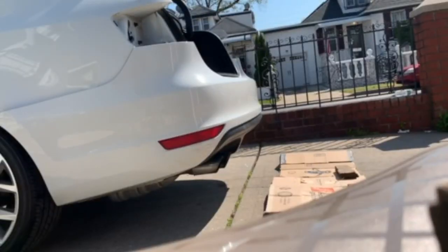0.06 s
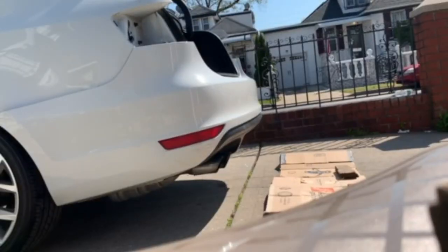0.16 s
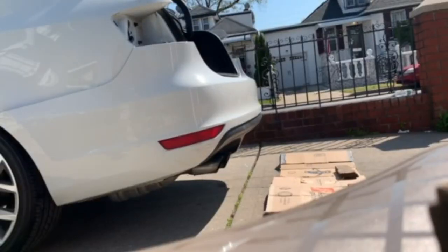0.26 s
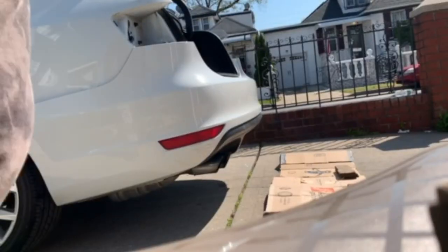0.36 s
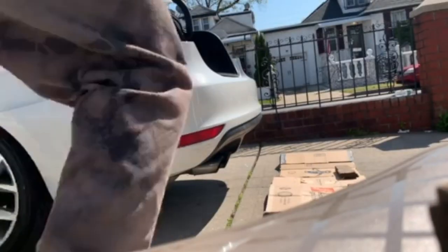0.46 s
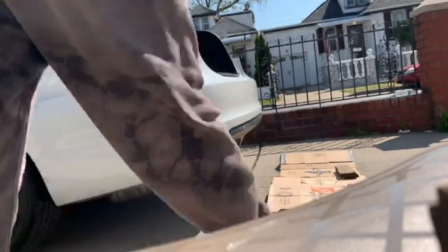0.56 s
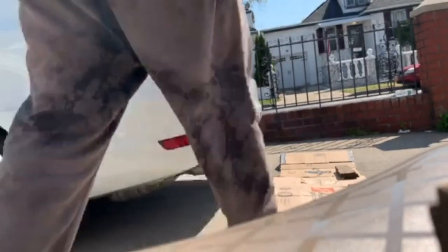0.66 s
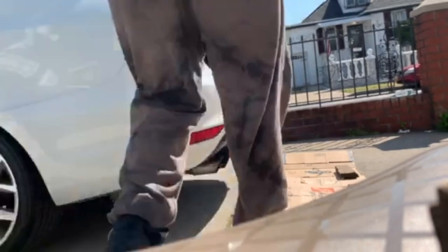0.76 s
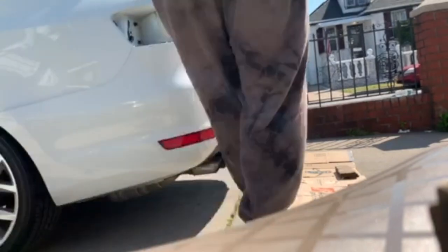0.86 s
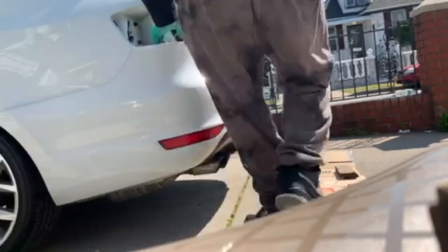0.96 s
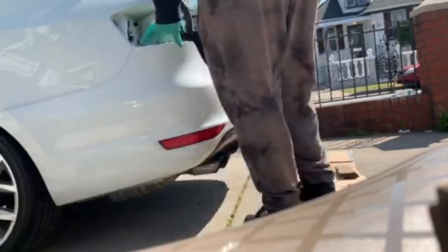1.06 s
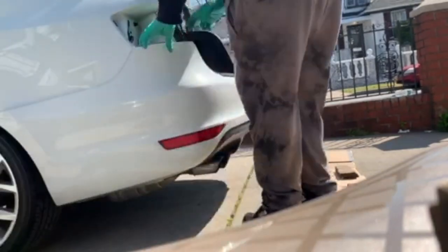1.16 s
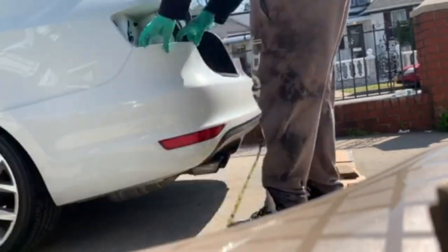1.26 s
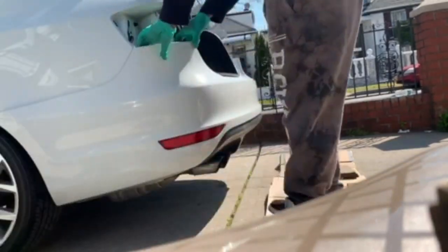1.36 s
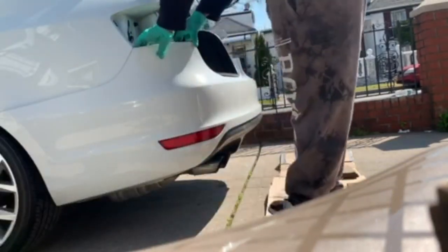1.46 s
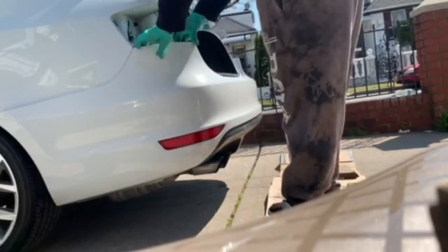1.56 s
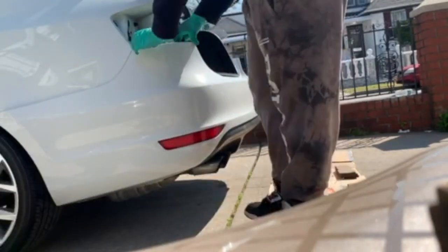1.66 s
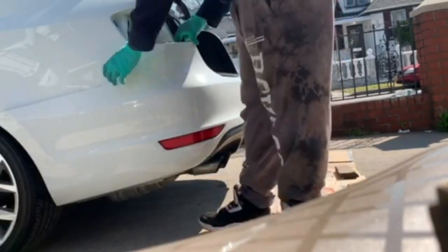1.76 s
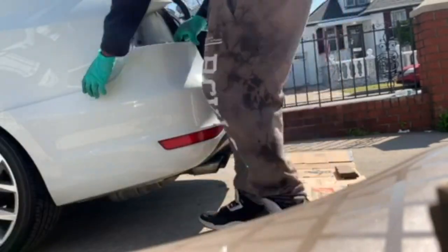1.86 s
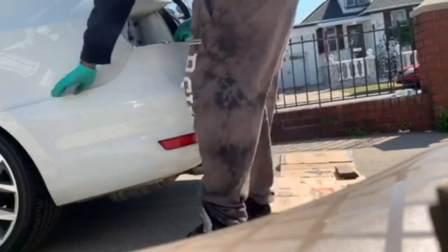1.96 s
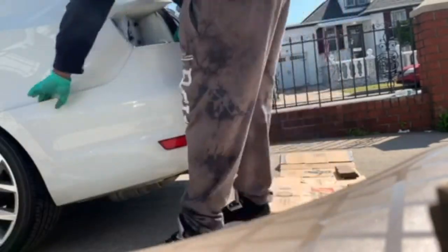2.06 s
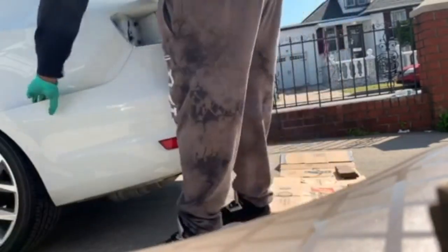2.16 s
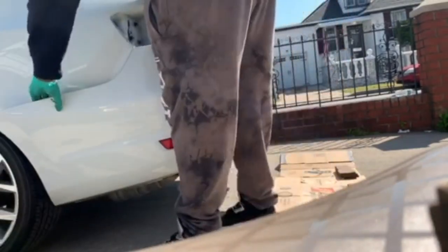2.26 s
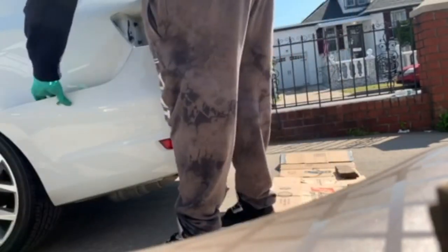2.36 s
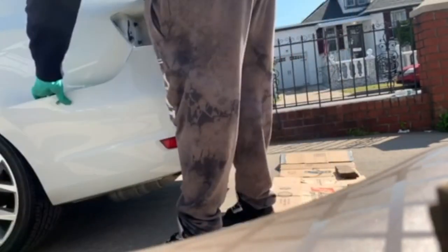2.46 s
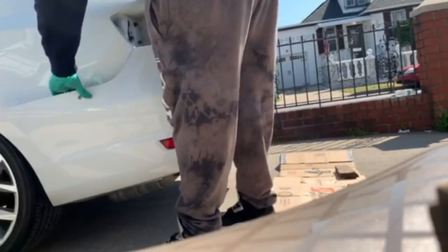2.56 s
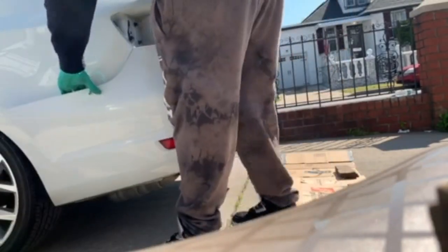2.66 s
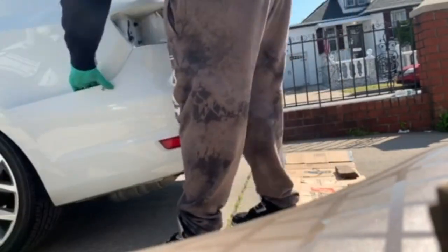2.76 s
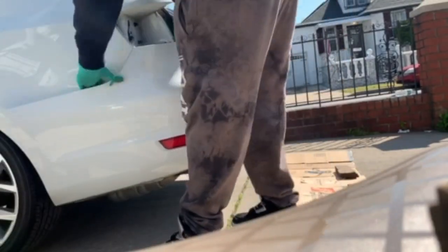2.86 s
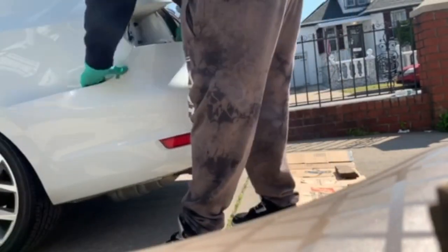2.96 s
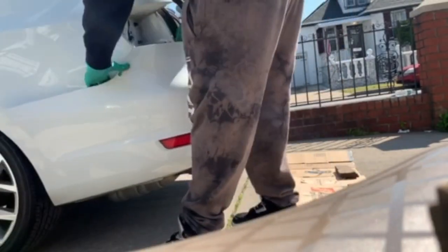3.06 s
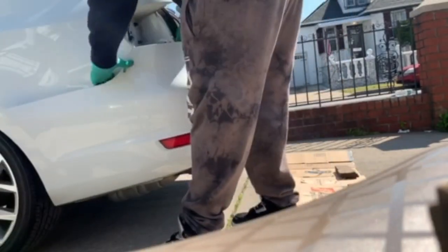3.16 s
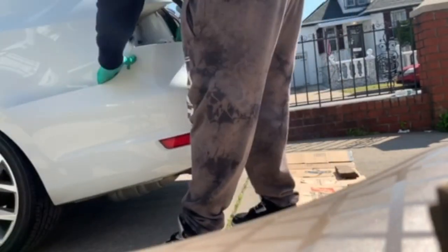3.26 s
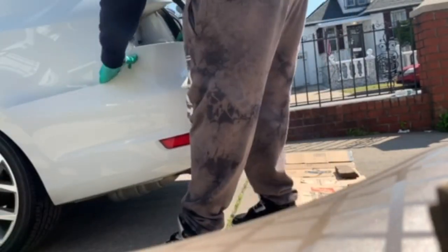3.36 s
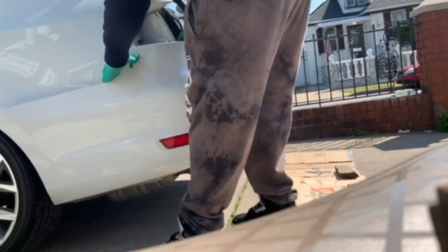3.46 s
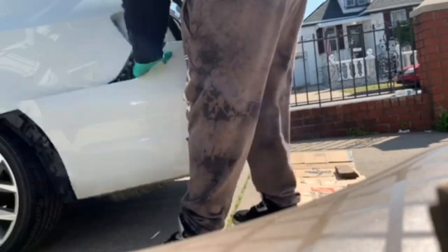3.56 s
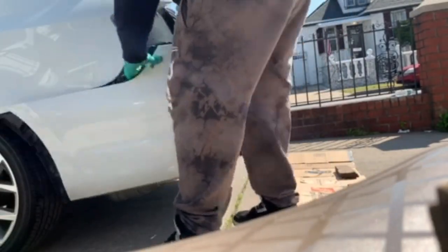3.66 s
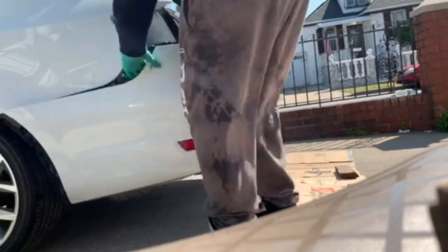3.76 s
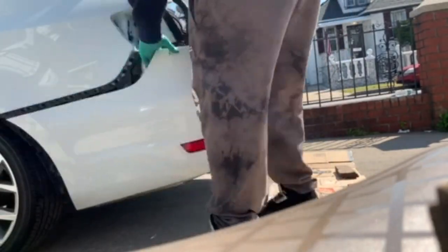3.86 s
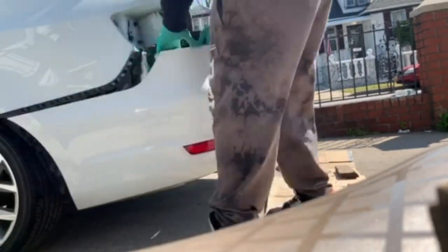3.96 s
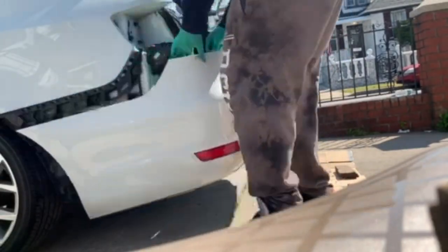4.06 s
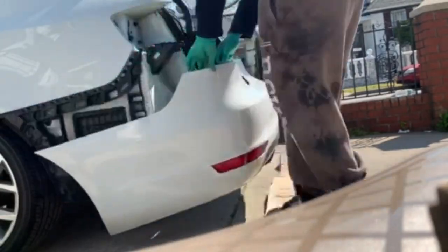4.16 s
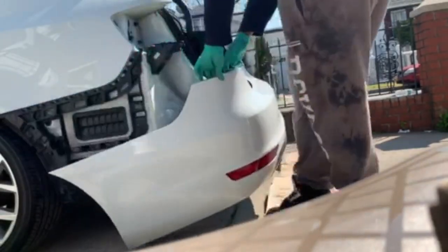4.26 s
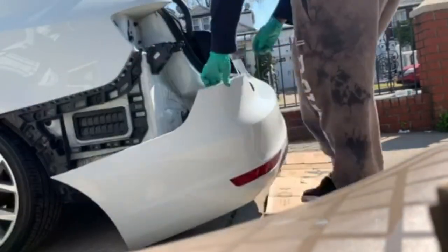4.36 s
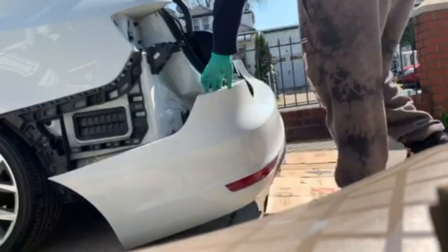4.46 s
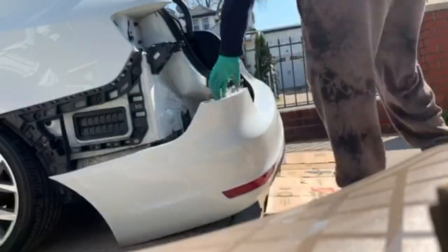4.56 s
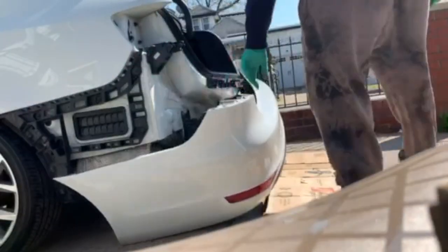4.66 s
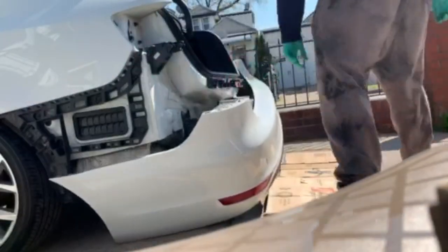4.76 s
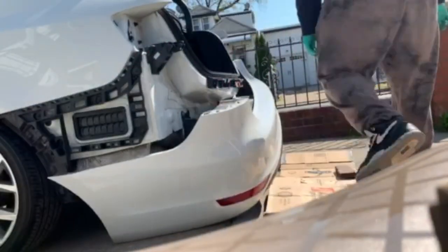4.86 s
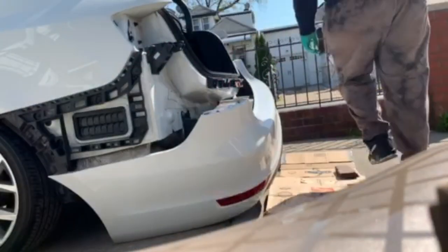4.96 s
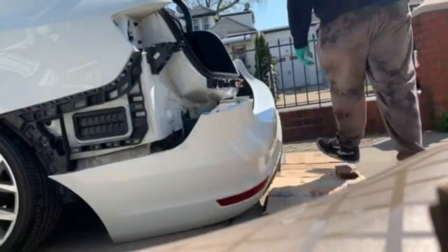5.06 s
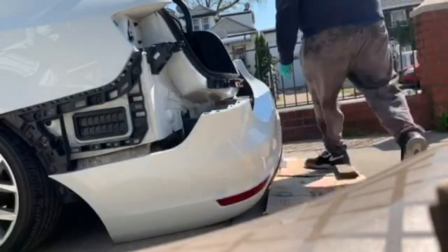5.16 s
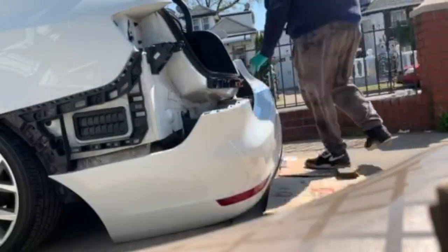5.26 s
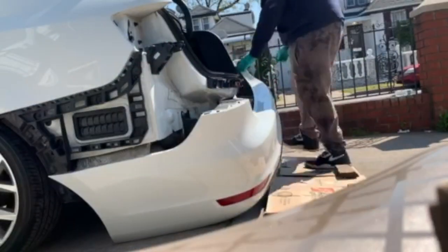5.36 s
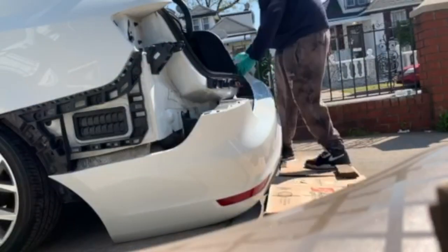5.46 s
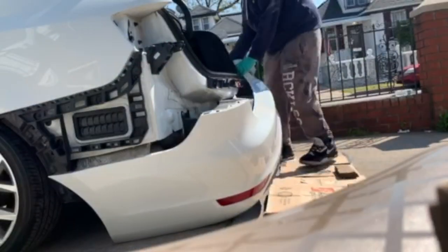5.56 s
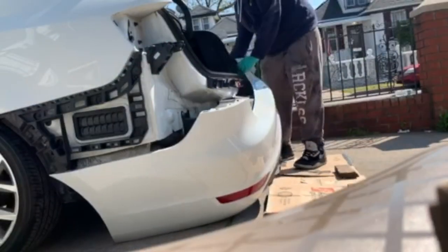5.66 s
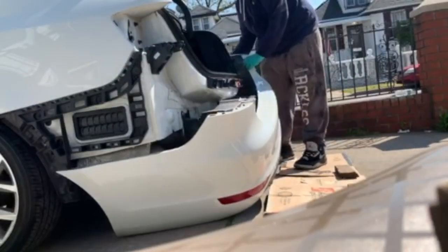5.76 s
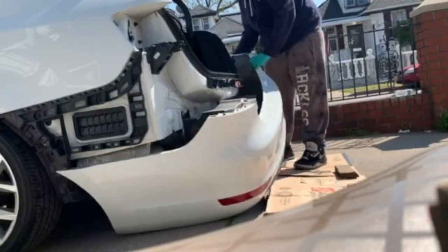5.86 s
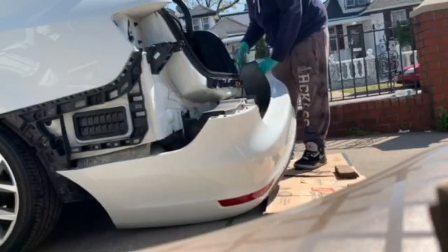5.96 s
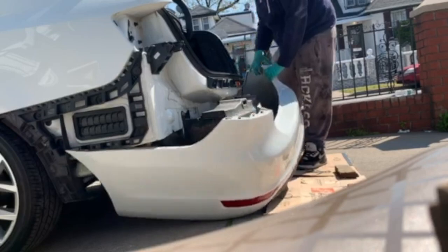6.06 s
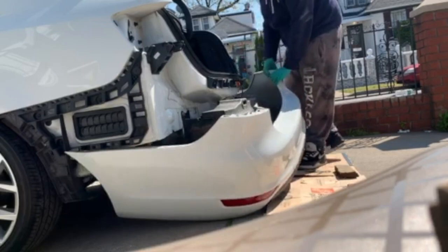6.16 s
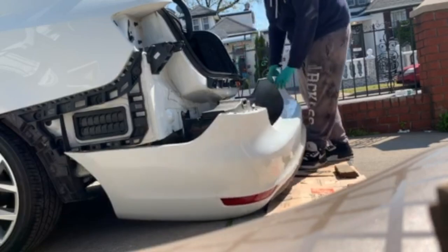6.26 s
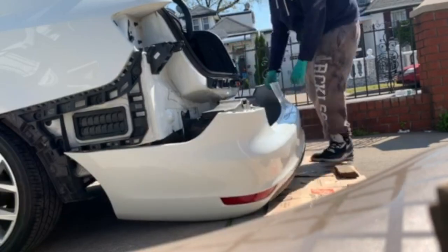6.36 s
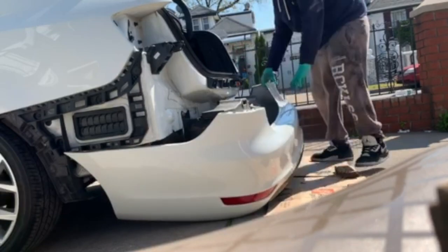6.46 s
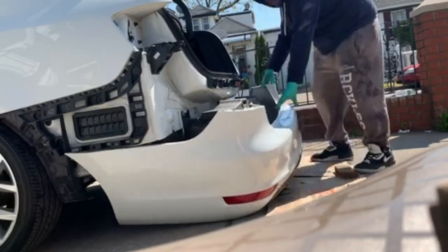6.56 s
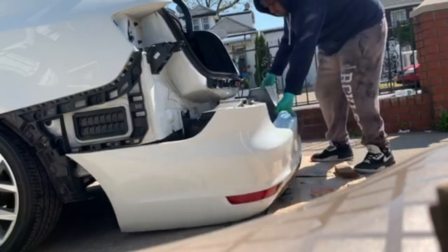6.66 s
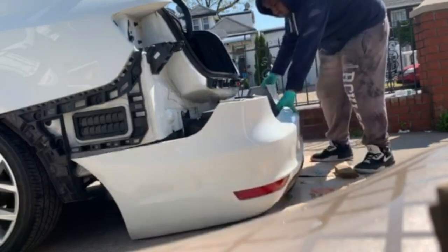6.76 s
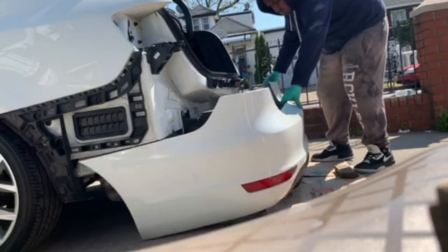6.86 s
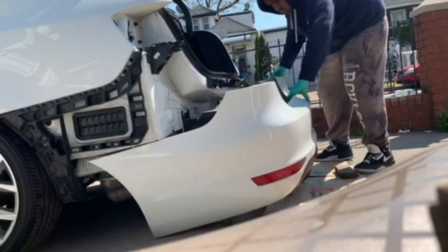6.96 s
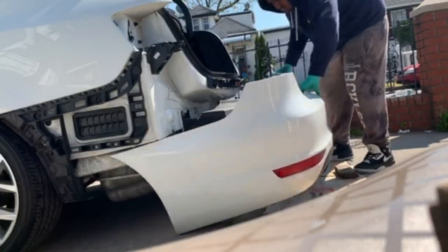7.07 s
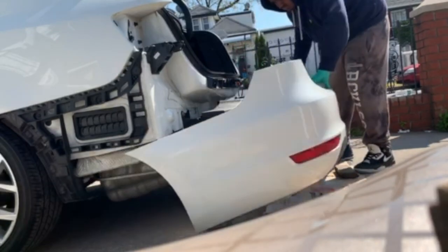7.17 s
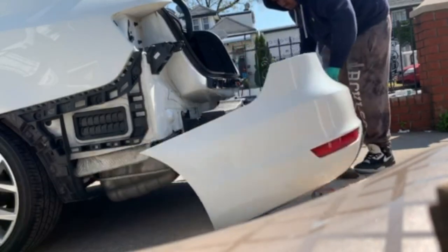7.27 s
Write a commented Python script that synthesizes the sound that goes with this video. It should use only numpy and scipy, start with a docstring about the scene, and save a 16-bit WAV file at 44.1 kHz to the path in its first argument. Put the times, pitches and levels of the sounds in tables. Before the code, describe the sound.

Over faint traffic, cloth rustles and shoes scuff grit, then a plastic bumper cover cracks loose, knocks hollowly, drops and drags across concrete.

```python
"""Bumper cover pulled off in a driveway

Far traffic rumbles and an engine pulls away: filtered noise and summed sines. Trousers rustle and shoes
scuff on grit: shaped noise grains. A plastic bumper cover cracks from its clips, knocks about and drops on
the concrete: noise bursts ring its shell. It is dragged with stick-slip noise, squeaks, twangs and wobbles.
Reflections surround the cover and the person; two spaced microphone ports pick up everything."""
import sys
import numpy as np
from scipy import signal
from scipy.fft import rfft, irfft, next_fast_len
from scipy.io import wavfile
from scipy.ndimage import uniform_filter1d

SR = 44100
rng = np.random.default_rng(int(sys.argv[2]) if len(sys.argv) > 2 else 0)


def transcribe(u):
    """Save the signal u as a 16-bit wav file named by the first command-line argument.

    u: samples, shape (n,) or (channels, n), limited to [-1, 1]; the rate is SR.
    q: integer samples, one column per channel.
    """
    v = np.clip(np.atleast_2d(u).T, -1, 1)
    q = np.round(v * 32767).astype(np.int16)
    wavfile.write(sys.argv[1], SR, q)


N = 321997
TIME = np.arange(N) / SR  # s
THUD, CLACK, SNAP = (70, 350), (1700, 5000), (5000, 16000)  # ranges of the sound, f/Hz


def from_db(db):
    """Decibels to gain."""
    return 10 ** (np.asarray(db) / 20)


def rms_one(x):
    """Scale to rms 1."""
    return x / np.sqrt(np.mean(x ** 2) + 1e-20)


def in_time(rows):
    """Each column of a curve at every sample."""
    s, *columns = np.transpose(rows)
    return [np.interp(TIME, s, c) for c in columns]


def at_hz(points, hz):
    """Read a spectrum on a log-frequency axis."""
    f, value = np.transpose(points)
    return np.interp(np.log(hz + 1), np.log(f), value)


def drift(rate):
    """Smooth random motion of rms 1, with this many knots per second."""
    knots = rng.standard_normal(int(N / SR * rate) + 2)
    return rms_one(np.interp(TIME * rate, np.arange(len(knots)), knots))


def add(out, s, sound):
    """Mix a sound in at a time."""
    at = int(s * SR)
    out[:, at:at + sound.shape[1]] += sound[:, :N - at]


def response(colour, edges, size=1024):
    """Minimum-phase impulse response of one range of a colour, with unit energy."""
    hz = np.fft.rfftfreq(size, 1 / SR) + 1
    slopes = np.sqrt((1 + (edges[0] / hz) ** 8) * (1 + (hz / edges[1]) ** 8))
    gain = from_db(at_hz(colour, hz)) / slopes
    # folding the cepstrum onto positive time makes the phase minimal
    cepstrum = irfft(np.log(gain + 1e-6))
    cepstrum[1:size // 2] *= 2
    cepstrum[size // 2 + 1:] = 0
    return rms_one(irfft(np.exp(rfft(cepstrum)))) / np.sqrt(size)


def tint(x, colour, edges):
    """Pass a pair of signals through one range of a colour."""
    return signal.fftconvolve(x, response(colour, edges)[None], axes=1)[:, :x.shape[1]]


def resonance(x, hz, t60):
    """One ringing mode, gain 1 at its centre."""
    r, w = from_db(-60 / (t60 * SR)), 2 * np.pi * hz / SR
    return signal.lfilter([(1 - r * r) / 2, 0, (r * r - 1) / 2], [1, -2 * r * np.cos(w), r * r], x + 1e-18)


def contact(colour, edges, t60, rise, grain_db, spot_hz=None, size=9000):
    """Chatter that builds and dies, optionally ringing at the struck spot; the energy of 20 ms at rms 1."""
    t = TIME[:size]
    envelope = (1 - np.exp(-t / max(rise, 1e-5))) * from_db(-60 * t / max(t60, .004))
    grains = rng.standard_normal((2, size)) * from_db(grain_db * rng.standard_normal(size))
    sound = tint(grains * envelope, colour, edges)
    if spot_hz:
        sound = sound + from_db(6.0) * resonance(sound, spot_hz, t60=0.022)
    return sound / np.sqrt(np.sum(sound ** 2, axis=1, keepdims=True) / (.02 * SR))


def slips(per_s, spread_db, t60):
    """Envelope of stick and slip: catches at random moments, each dying away; rms 1."""
    strength = from_db(spread_db * np.clip(rng.standard_normal(N), -2, 2))
    catches = (rng.random(N) < per_s / SR) * strength
    # energies add up, so the decay runs on power
    power = signal.lfilter([1], [1, -from_db(-120 / (t60 * SR))], catches ** 2 + 1e-18)
    return rms_one(np.sqrt(power))


# colour of the far rumble: f/Hz, spectrum level/dB
AIR_COLOUR = [(25, -48.5), (65, -13.5), (120, 5), (260, -5.5), (400, -9.5), (660, -16), (1500, -22),
              (2700, -32), (5000, -42.5), (12000, -48.5), (16000, -80)]
# a far engine pulls away and changes gear: t/s, firing rate f/Hz before its waver, level/dB
ENGINE_PULL = [(0, 52.64, -49), (.36, 59.4, -52.5), (.45, 54.5, -53), (.65, 56.2, -55), (.8, 58, -75)]
# its exhaust: multiple of the firing rate, relative level/dB
EXHAUST_ORDERS = [(6, -7), (8, 0), (9, -8), (10, -4)]


def town():
    """Far traffic is unevenly swelling noise; one engine is a stack of firing-rate harmonics."""
    spectrum = from_db(at_hz(AIR_COLOUR, np.fft.rfftfreq(N, 1 / SR)))
    rumble = rms_one(irfft(rfft(rng.standard_normal((2, N))) * spectrum, N))
    firing_hz, engine_db = in_time(ENGINE_PULL)
    turn = 2 * np.pi * np.cumsum(firing_hz * (1 + 0.0097 * drift(22))) / SR
    engine = sum(from_db(db) * np.sin(k * turn) for k, db in EXHAUST_ORDERS)
    engine = from_db(engine_db) * engine * [[1], [0]]  # direct path only
    return rumble * from_db(-44.5 + 1.93 * drift(25)) + engine


# swishes of trousers and sleeves: centre t/s, level/dB
CLOTH_SWISHES = [(0.049, -56.5), (.184, -58), (0.393, -56), (.53, -61), (1.23, -58), (1.641, -53),
                 (2.207, -57), (2.462, -56.5), (2.594, -52), (2.69, -47.5), (2.79, -60), (2.934, -59),
                 (3.106, -62)]
# colour of gritty friction, shared by cloth, shoes, sand and tabs: f/Hz, spectrum level/dB
GRIT_COLOUR = [(150, 9.5), (600, 12.5), (1500, 0.5), (3000, -6), (4300, -5.5), (8000, -11), (12000, -13.5),
               (16000, -20.5)]
SWISH_HALF_S = 0.026  # spread of a swell


def cloth():
    """Fabric brushes on fabric: dense little catches under soft swells."""
    swell = sum(from_db(db) * np.exp(-.5 * ((TIME - s) / SWISH_HALF_S) ** 2) for s, db in CLOTH_SWISHES)
    fibres = rng.standard_normal((2, N)) * slips(per_s=720, spread_db=10.0, t60=0.042) * swell
    bright = tint(fibres * from_db(-3.5), GRIT_COLOUR, (4200, 12500))
    return bright + tint(fibres * from_db(-2.0), GRIT_COLOUR, (1500, 4200))


# shoes on gritty concrete and cardboard: t/s, sole level/dB, grit level/dB, decay t60/s
SHOE_STEPS = [(0.715, -76, -58, 0.071), (0.889, -41.5, -52, 0.17), (1.116, -46.5, -53.5, 0.32),
              (1.147, -38.5, -59, 0.033), (1.249, -42, -59, 0.14), (1.361, -44.5, -67, 0.15),
              (1.403, -45.5, -82, 0.057), (1.644, -71, -53.5, 0.04), (1.775, -46.5, -67.5, 0.11),
              (3.851, -54, -52.5, 0.23), (5.135, -36, -52, 0.39), (5.155, -43, -39, 0.046),
              (5.218, -57, -56.5, 0.019), (5.309, -70, -61.5, 0.08), (5.394, -43.5, -85, 0.032),
              (5.456, -43.5, -57.5, 0.052), (5.515, -47, -61.5, 0.062), (5.591, -44, -65, 0.045),
              (5.929, -46, -59.5, 0.055), (6.306, -42, -67, 0.044), (6.42, -43, -62.5, 0.097)]
SOLE_CRUNCH_DB, GRIT_CRUNCH_DB = -17.5, 3  # what sole and grit each lend to the crunch


def steps():
    """A sole lands and crushes grit under it: three noise bursts, from low to high."""
    out = np.zeros((2, N))
    for s, sole_db, grit_db, t60 in SHOE_STEPS:
        sole = from_db(sole_db) * contact(GRIT_COLOUR, (330, 1900), t60, rise=0.0016, grain_db=4.0)
        crushed = np.hypot(from_db(sole_db + SOLE_CRUNCH_DB), from_db(grit_db + GRIT_CRUNCH_DB))
        crunch = crushed * contact(GRIT_COLOUR, CLACK, t60, rise=0.00048, grain_db=12.5)
        grit = from_db(grit_db) * contact(GRIT_COLOUR, SNAP, t60, rise=0.02 * t60, grain_db=5.5)
        add(out, s, sole + crunch + grit)
    return out


# a push builds over a share of its length and dies away once it stops
SLIDE_ATTACK_SHARE, SLIDE_T60_S = 0.46, 0.13


def stroke(s, length):
    """Attack, hold and release of one push."""
    t = TIME - s
    attack = np.clip(t / (SLIDE_ATTACK_SHARE * length), 0, 1)
    return attack * from_db(-60 * np.clip(t - length, 0, 1) / SLIDE_T60_S)


# the loose shell wobbles slowly: t/s, length t/s, level/dB
PANEL_WOBBLES = [(4.497, 0.14, -38.5), (5.007, 0.1, -43), (6.408, 0.058, -39.5), (6.83, 0.22, -40)]
WOBBLE_RANGE_HZ = (82, 155)


def wobbles():
    """The unsupported panel sways and pumps the air: swells of low band noise."""
    sway = sum(from_db(db) * stroke(s, length) for s, length, db in PANEL_WOBBLES)
    band = signal.butter(2, WOBBLE_RANGE_HZ, "band", fs=SR, output="sos")
    return sway * rms_one(signal.sosfilt(band, rng.standard_normal((2, N))))


# stiff mounting tabs that twang when flicked: t/s, level/dB before a 3 dB lift, f/Hz, ring t60/s
MOUNTING_TABS = [(3.505, -22, 2820, .009), (3.539, -21, 2580, 0.027), (3.558, -13.5, 2460, 0.008),
                 (4.49, -14, 2740, 0.0074), (4.709, -29, 2320, .018), (5.671, -14.5, 4020, 0.002),
                 (6.825, -28, 2870, 0.0085)]


def tabs():
    """A tab springs free: a noise flick drives one mode; a long t60 rings, a short one only cracks."""
    out = np.zeros((2, N))
    for s, db, hz, t60 in MOUNTING_TABS:
        flick = contact(GRIT_COLOUR, (hz / 2, hz * 1.29), t60=0.026, rise=0.00031, grain_db=2.5)
        twang = resonance(flick, hz, t60)
        add(out, s, from_db(db + 3) * twang / np.abs(twang).max())
    return out


# resonances of the cover's rim: f/Hz, level/dB, ring t60/s
RIM_MODES = [(2333, -2.5, 0.045), (4175, 6, 0.025)]


def rim(force):
    """The stiff rim adds its high, steady resonances to any scraping."""
    return force + sum(from_db(db) * resonance(force, hz, t60) for hz, db, t60 in RIM_MODES)


# the lower edge grinds over grit on the concrete: t/s, level/dB, t60/s of the jolt
EDGE_GRINDS = [(6.103, -37.5, 0.019), (6.55, -40.5, 0.083), (6.615, -28.5, 0.086), (6.666, -28, 0.065),
               (6.7, -42, 0.17)]
# colour of the plastic, shared by the cover's blows, slides, squeaks and the jolts of its grinds: f/Hz,
# spectrum level/dB
PLASTIC_COLOUR = [(50, -42), (100, 2), (190, 2), (300, 4), (420, 6), (660, 4), (900, 1), (1400, -3.5),
                  (1800, -4), (2700, -3), (3300, -15), (4000, -9.5), (5200, -23.5), (9000, -28.5),
                  (15000, -39)]


def grinds():
    """Grains of sand crack under the edge, make the rim ring and jolt the plastic."""
    out = np.zeros((2, N))
    for s, db, t60 in EDGE_GRINDS:
        ring = rim(contact(GRIT_COLOUR, (2200, 6000), t60 * 0.91, rise=0.00079, grain_db=5.5))
        sand = contact(GRIT_COLOUR, SNAP, t60 * 1.6, rise=0.0003, grain_db=9.5)
        jolt = contact(PLASTIC_COLOUR, (120, 2800), t60, rise=0.0014, grain_db=0.0)
        add(out, s, from_db(db) * (from_db(-1.5) * sand + from_db(-4.5) * ring + from_db(2.5) * jolt))
    return out


# the slips lock into a rough squeak: t/s, length t/s, level/dB, slip rate f/Hz before its waver
EDGE_SQUEAKS = [(6.065, 0.024, -32, 775)]
SQUEAK_WAVER = 0.02  # rms share of the slip rate


def squeaks():
    """Under pressure the edge slips at a nearly even rate: a jerk per turn drives the rim."""
    out, waver = np.zeros((2, N)), 1 + SQUEAK_WAVER * drift(110)
    for s, length, db, per_s in EDGE_SQUEAKS:
        turns = np.floor(np.cumsum(per_s * waver) / SR)
        jerks = np.diff(turns, prepend=0) * from_db(4.2 * rng.standard_normal((2, N)))
        rub = rim(tint(jerks, PLASTIC_COLOUR, (1200, 5000)))
        out += from_db(db) * stroke(s, length) ** 2 * rms_one(rub)
    return out


# the cover slides over its mounts and the ground:
# t/s, length t/s, level/dB, rasp level/dB relative to that, note of the edge f/Hz
COVER_SLIDES = [(3.66, 0.11, -44.5, -17, 444), (4.12, 0.12, -47, -3.5, 600), (4.359, 0.27, -42, -9, 480),
                (4.677, 0.075, -42.5, -12, 567), (4.772, 0.066, -40, -6, 600),
                (5.649, 0.13, -31.5, -13.5, 480), (6.037, 0.067, -32.5, -3.5, 710),
                (5.86, 0.95, -51.5, -12, 320), (6.561, 0.17, -33.5, -6.5, 345),
                (6.762, 0.046, -33, -12, 415), (6.791, 0.13, -45.5, -4.5, 310), (6.966, 0.12, -32, -7, 663),
                (7.079, 0.074, -37.5, -6.5, 560), (7.139, 0.084, -30, -9, 873)]
# how strongly and how long the edge sings, and how much less the shell flexes per octave of that note
EDGE_DB, EDGE_T60_S, FLEX_DB_PER_OCTAVE = -6, 0.025, -9.5
HISS_DB = -5.5  # mean hiss gain on the scrape


def drag():
    """The edge catches and slips: friction noise sings at its note, shakes the shell and rasps."""
    grains = rng.standard_normal((2, N)) * slips(per_s=500, spread_db=0.0, t60=0.027)
    # single slips come unevenly, but over a few of them the pull does steady work
    work = uniform_filter1d(grains ** 2, size=1300, axis=1)
    grains = grains / np.sqrt(np.abs(work) + 1e-6)
    push, scrape, bend, edge = 0, 0, 0, 0
    for s, length, db, rasp_db, note_hz in COVER_SLIDES:
        slide = from_db(db) * stroke(s, length)
        push = push + slide
        scrape = scrape + from_db(rasp_db) * slide
        bend = bend + slide * from_db(FLEX_DB_PER_OCTAVE * np.log2(note_hz / 550))
        edge = edge + slide * rms_one(resonance(grains, note_hz, EDGE_T60_S))
    edge = from_db(EDGE_DB) * edge
    body = tint(grains * push * from_db(-2.0), PLASTIC_COLOUR, (300, 1700))
    flex = tint(grains * bend * from_db(-5.5), PLASTIC_COLOUR, (90, 300))
    rasp = rim(tint(grains * scrape * from_db(1.4 * drift(260)), PLASTIC_COLOUR, CLACK))
    hiss = tint(grains * scrape * from_db(HISS_DB + 2 * drift(90)), PLASTIC_COLOUR, SNAP)
    return edge + body + flex + rasp + hiss


# a blow's first swing: gain, its loss per second of contact t60, and its own decay
IMPACT_DB, IMPACT_DB_PER_S, IMPACT_T60_S = 11, -250, 0.01


def impact(spot_hz, size=2000):
    """One push sets the struck spot swinging for a few cycles, on the direct path only; height 1."""
    t = TIME[:size]
    swing = np.sin(2 * np.pi * spot_hz * t) * (1 - np.exp(-t * spot_hz)) * from_db(-60 * t / IMPACT_T60_S)
    pressure = np.diff(swing, prepend=0)
    return pressure / np.abs(pressure).max() * np.array([[1], [0]])


# clips let go and the cover knocks about:
# t/s, level/dB, contact hardness level/dB, thud level/dB, struck spot f/Hz, knock t60/s
COVER_BLOWS = [(2.233, -29, -10, -6.5, 890, 0.055), (3.506, -17, -3.5, -8, 1190, 0.043),
               (3.511, -13, -15, -8, 652, 0.034), (3.515, -19.5, -9.5, -14, 680, 0.013),
               (3.521, -16, -10, -28, 1170, 0.13), (3.539, -26.5, -4, -21, 1140, 0.12),
               (3.547, -17.5, -14, 0.5, 460, 0.031), (3.559, -16, -15, -12, 486, 0.036),
               (3.577, -17.5, -20, -14, 623, 0.023), (3.598, -28, -29, -9, 720, .018),
               (3.606, -32, -27, -1.5, 600, 0.0091), (3.695, -40.5, -7, 2, 410, 0.047),
               (3.748, -44, -2, -1, 475, 0.069), (3.927, -39.5, -7.5, -5, 506, 0.12),
               (4.082, -27.5, -20.5, -9, 1290, 0.091), (4.097, -23.5, -15.5, -5, 565, 0.054),
               (4.187, -38, -7.5, -0.5, 390, 0.04), (4.305, -33.5, -14.5, 0, 557, 0.13),
               (4.411, -32.5, -24, -6, 490, .06), (4.428, -24, -22.5, -8.5, 550, 0.067),
               (4.454, -36, -28, -1, 580, .014), (4.491, -21, -15.5, -2.5, 586, 0.017),
               (4.511, -19, -27, -6, 576, 0.01), (4.544, -25.5, -26, -5, 450, 0.0085),
               (4.574, -31.5, -15.5, -5, 524, 0.023), (4.592, -34, -35, 5, 340, 0.0083),
               (4.705, -25, -18, -12, 640, 0.059), (5.672, -27.5, -7.5, -21, 530, 0.05),
               (5.711, -22, -15, -13, 810, 0.049), (5.717, -21.5, -17, -3.5, 410, 0.067),
               (5.738, -26, -14, -10, 513, 0.015), (5.776, -37.5, -9, 5, 330, 0.026),
               (5.798, -31, -13, -5, 475, 0.068), (5.816, -38.5, -20, 8.5, 347, 0.024),
               (6.108, -28.5, -18, 1, 580, 0.031), (6.16, -38.5, -10, 0, 770, 0.028),
               (6.222, -35, -13, -2, 442, 0.047), (6.549, -34, -4, -12, 790, 0.02),
               (6.595, -27.5, -5.5, -1, 356, 0.068), (6.69, -30, -21, -8, 396, 0.011),
               (6.709, -30, -22, -1.5, 437, 0.035), (6.732, -32, -17, -2.5, 380, 0.027),
               (6.826, -35.5, -1, 2, 514, 0.021), (7.107, -37.5, -15, -11, 480, 0.021)]
# a hard knock reaches further above the struck spot (this far at 0 dB); a soft one stays low and woody
KNOCK_REACH_HZ = 2010
OVERTONE_RATIO = 4.34  # the clack rings at this multiple of the struck spot
SNAP_DB = -5.5  # snap relative to clack


def blows():
    """Clips snap and edges strike; short contacts are sharp, long ones build up as the plastic gives."""
    out = np.zeros((2, N))
    for s, db, hard_db, thud_db, spot_hz, t60 in COVER_BLOWS:
        rise = 0.00032 + 0.23 * t60 ** 2
        top_hz = spot_hz + KNOCK_REACH_HZ * from_db(hard_db / 2)
        thud = contact(PLASTIC_COLOUR, THUD, t60 * 2.07, rise, grain_db=4.5)
        knock = contact(PLASTIC_COLOUR, (THUD[1], top_hz), t60, rise, grain_db=4.5, spot_hz=spot_hz)
        clack = contact(PLASTIC_COLOUR, CLACK, t60 * 0.86, rise, grain_db=10.0,
                        spot_hz=spot_hz * OVERTONE_RATIO)
        snap = contact(PLASTIC_COLOUR, SNAP, t60 * 2.0, rise, grain_db=1.0)
        low = from_db(thud_db) * thud + from_db(-1.43) * knock
        high = from_db(hard_db) * clack + from_db(hard_db + SNAP_DB) * snap
        add(out, s, from_db(db) * (low + high))
        add(out, s, from_db(db + IMPACT_DB + IMPACT_DB_PER_S * t60) * impact(spot_hz))
    return out


# modes of the plastic shell: f/Hz, level/dB before ring_db, ring t60/s
SHELL_MODES = [(168.4, -4, 0.08), (341.4, 2, 0.094), (465.3, -2, 0.23), (552, -3.5, 0.16),
               (665, -3.5, 0.19), (737.7, 2, 0.11), (917, -3.5, 0.32), (1180, -6, 0.21), (1330, -1, 0.06),
               (2610, -12, 0.07)]


def shell(force, ring_db):
    """The thin cover rings on in its modes after whatever excites it."""
    return force + sum(from_db(db + ring_db) * resonance(force, hz, t60) for hz, db, t60 in SHELL_MODES)


def driveway(x, early_db, early_t60, late_db, late_t60, dull_hz):
    """Quick reflections off the car and the ground, then a faint tail between the houses."""
    t = TIME[:SR]
    early = rms_one(rng.standard_normal((2, SR)) * from_db(-60 * t / early_t60) * (t > .004))
    late = rms_one(rng.standard_normal((2, SR)) * from_db(-60 * t / late_t60) * (t > .03))
    echoes = (from_db(early_db) * early + from_db(late_db) * late) / np.sqrt(SR)
    echoes = signal.sosfilt(signal.butter(1, min(dull_hz, 18000), fs=SR, output="sos"), echoes)
    return x + signal.fftconvolve(x, echoes, axes=1)[:, :N]


# the two microphone ports: f/Hz, likeness, share of the full lag, left minus right level/dB
MIC_PORTS = [(103, 0.98, 0.25, -1.4), (403, 0.98, 0.71, -3), (1250, 0.62, 0.67, 0.2),
             (2300, 0.16, 1.49, 0.5), (5370, 0.091, 1.365, -1), (12500, 0.3, 0.83, -1)]


def at_ports(pair, lag_ms):
    """A direct and a scattered signal reach two microphone ports; the left one hears them first."""
    hz = np.fft.rfftfreq(next_fast_len(N + 500), 1 / SR)
    direct, scattered = rfft(pair, 2 * (len(hz) - 1))
    alike, share, balance_db = (at_hz(np.array(MIC_PORTS)[:, [0, k]], hz) for k in (1, 2, 3))
    alike = np.clip(alike, 0, .999)
    mid, side = np.sqrt((1 + alike) / 2) * direct, np.sqrt((1 - alike) / 2) * scattered
    # each port takes half of the lag and half of the balance
    lead = np.exp(1j * np.pi * hz * share * lag_ms / 1000) * from_db(balance_db / 2)
    return irfft([(mid + side) * lead, (mid - side) / lead])[:, :N]


def scene():
    """Cover and person start to the left; the person, then the cover, move closer to the middle."""
    cover = shell(blows() + drag() + squeaks() + grinds(), ring_db=-2.5) + tabs() + wobbles()
    cover = driveway(cover, early_db=-13.0, early_t60=0.18, late_db=-25.5, late_t60=1.0, dull_hz=3860)
    person = steps() + cloth()
    person = driveway(person, early_db=-10.5, early_t60=0.26, late_db=-32.5, late_t60=.5, dull_hz=9000)
    # 0.1 s crossfades to the shorter lag
    walked, dragged = (np.clip((TIME - s) * 10, 0, 1) for s in (4.9, 6.3))
    middle = person * walked + cover * dragged
    left = cover + person - middle + town()
    return at_ports(left, lag_ms=0.22) + at_ports(middle, lag_ms=0.15)


CUTOFF_HZ = 16200


def record(dry):
    """Peaks stop at full scale, then a steep low-pass cuts the top."""
    low_pass = signal.ellip(10, .05, 70, CUTOFF_HZ, fs=SR, output="sos")
    return signal.sosfiltfilt(low_pass, np.clip(dry, -1, 1))


dry = scene()
out = record(dry)
transcribe(out)
```